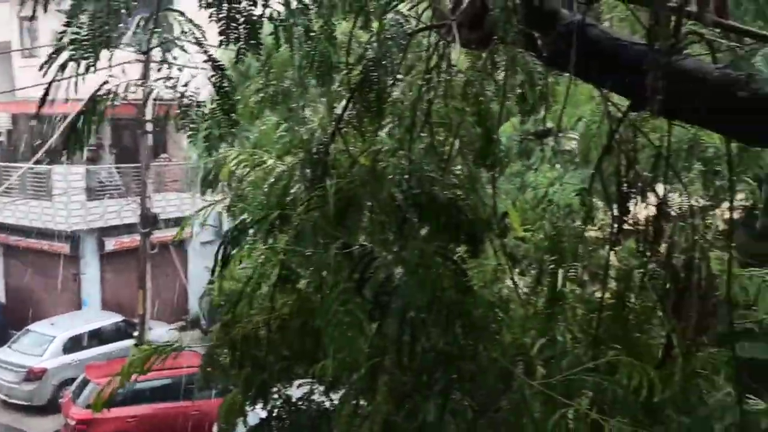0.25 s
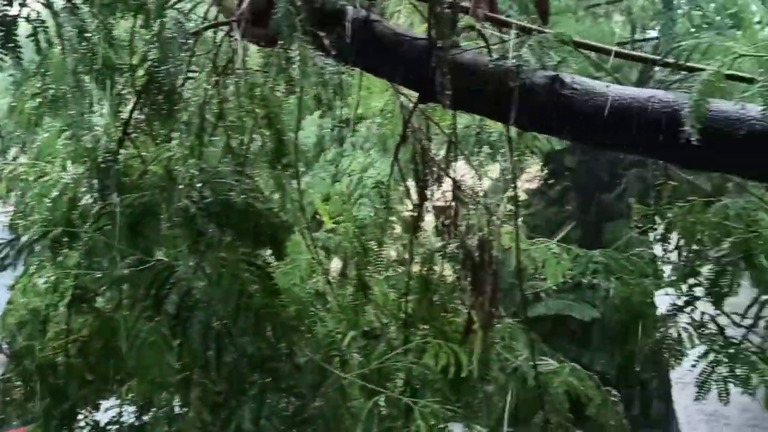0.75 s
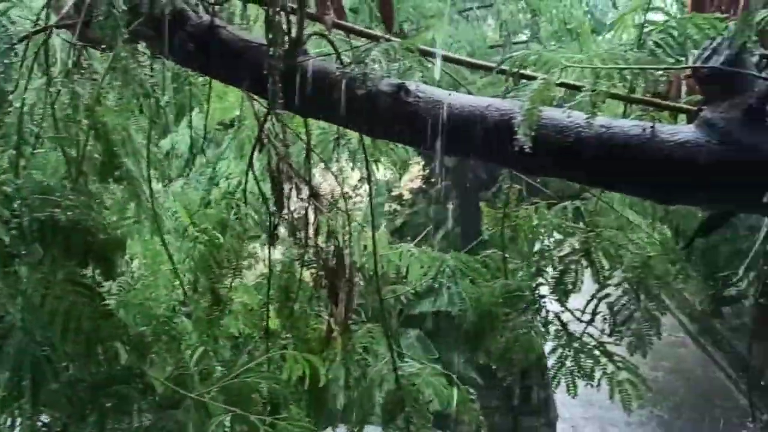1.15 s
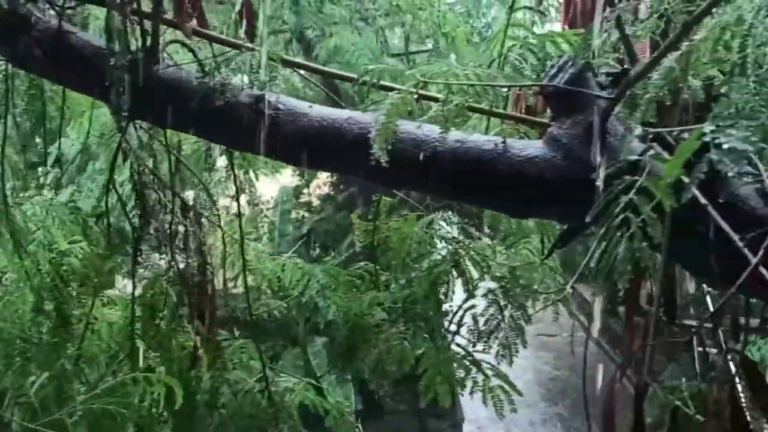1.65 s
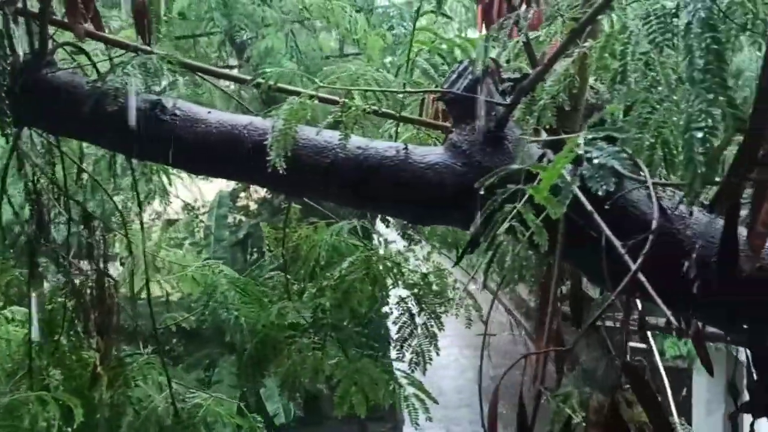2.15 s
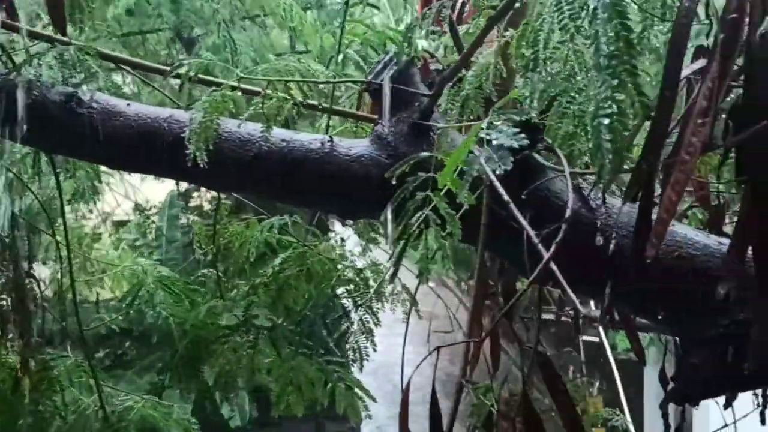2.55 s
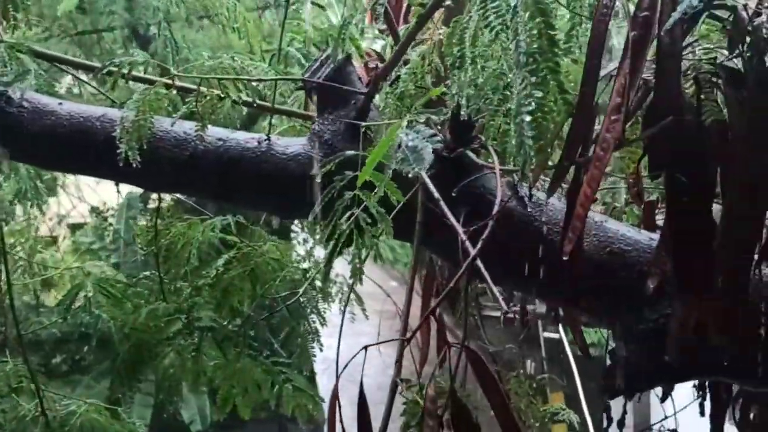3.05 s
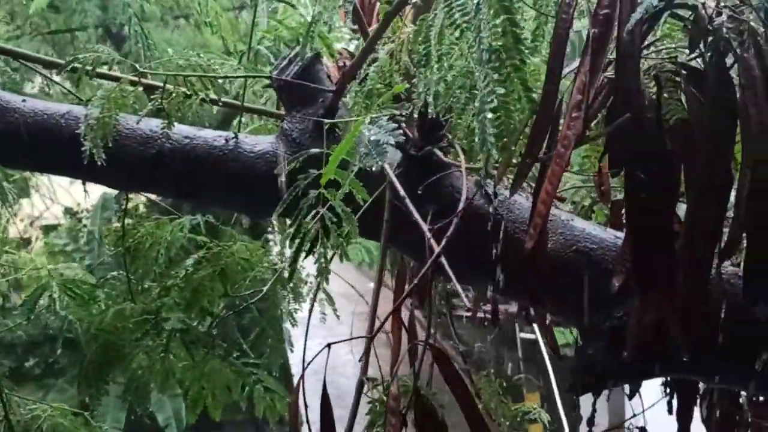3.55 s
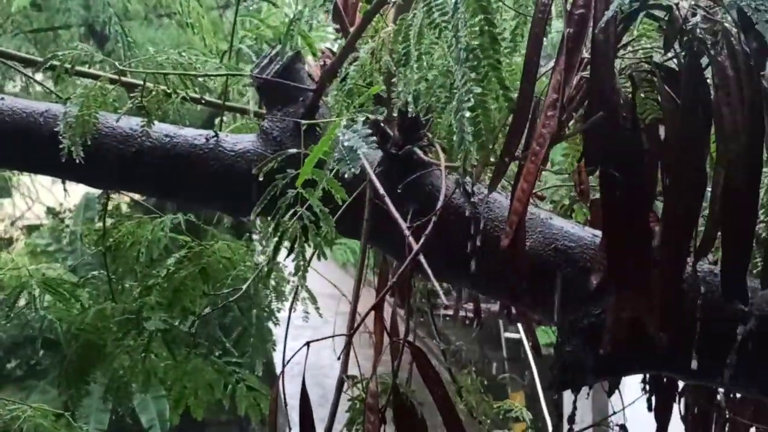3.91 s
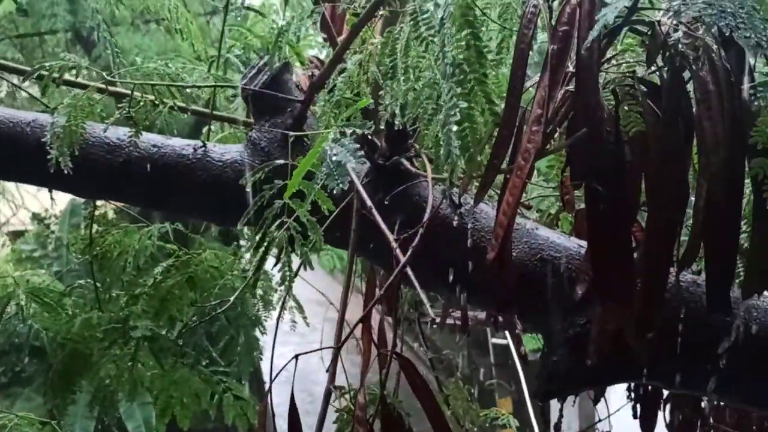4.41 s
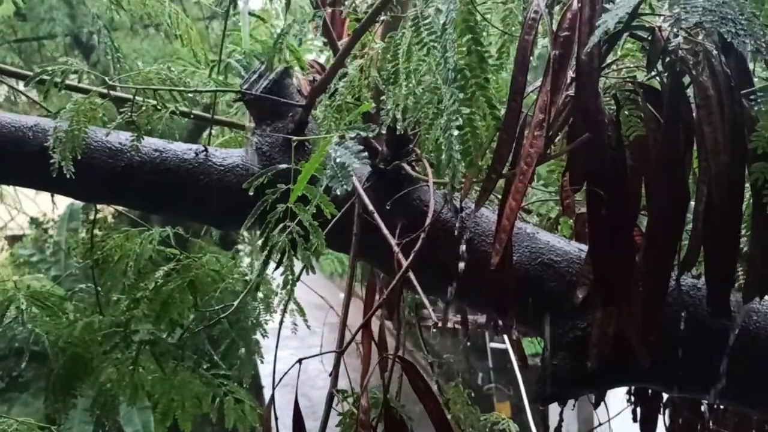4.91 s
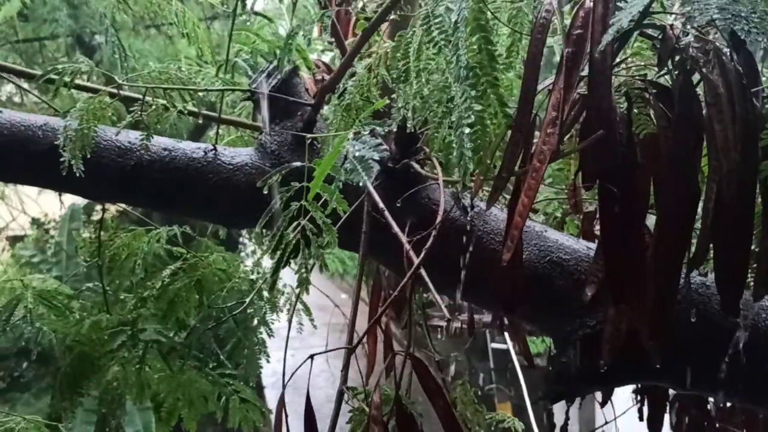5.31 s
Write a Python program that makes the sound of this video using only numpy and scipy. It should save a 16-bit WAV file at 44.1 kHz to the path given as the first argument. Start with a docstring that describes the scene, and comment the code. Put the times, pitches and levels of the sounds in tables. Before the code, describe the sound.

Heavy rain pours without a break for about five and a half seconds, heard from a sheltered spot beside tree branches. Far drops merge into a dense, wide hiss and roar, with fine patter on leaves and a soft low street rumble beneath. Rain drums dully on a sheet roof, with a few quick gushes of runoff in the first half second and occasional ones later. A faint hollow ring of drops on parked cars fades over the first two seconds. From about 1.6 seconds, fat drops burst close by in sharp, bright splats, clustering around 2.5 seconds, 3 to 3.4 seconds and 4.5 to 5 seconds. Thin ticks on wet bark and light taps on hanging seed pods mix in. Small drips plop into puddles throughout, the clearest near 4.8 seconds. The far hiss eases very slightly toward the end.

```python
"""Heavy rain on a street with trees

Heard from a sheltered spot beside the branches. Countless far drops merge into a wash over the street's
rumble; nearer ones patter on leaves and hanging seed pods, drum on a sheet roof and ring parked cars.
Close by, fat drops burst, small ones shatter on wet bark and drips plop into puddles.
Two microphone ports a hand apart hear the bass alike and the treble each on its own."""
import sys
import numpy as np
from scipy import signal
from scipy.fft import rfft, irfft, next_fast_len
from scipy.io import wavfile
from scipy.ndimage import uniform_filter1d

SR = 44100
rng = np.random.default_rng(int(sys.argv[2]) if len(sys.argv) > 2 else 0)


def wav_out(sig):
    """Save sig, one row per channel (or a flat mono array), as 16-bit PCM at SR to the path in sys.argv[1]."""
    wavfile.write(sys.argv[1], SR, np.round(np.clip(np.atleast_2d(sig).T, -1, 1) * 32767).astype(np.int16))


N = 245637
TIME = np.arange(N) / SR
FFT_SIZE = 2 * next_fast_len(N // 2 + 4096)
BIN_HZ = np.arange(FFT_SIZE // 2 + 1) * SR / FFT_SIZE
PORT_DELAY_S = 0.00049   # travel time of sound from port to port


def from_db(db):
    """Decibels to gain."""
    return 10 ** (np.asarray(db) / 20)


def rms_one(x):
    """Scale to rms 1."""
    return x / np.sqrt(np.mean(x ** 2) + 1e-20)


def gain_per_bin(points):
    """A table of (Hz, dB) as a gain at every frequency."""
    hz, db = np.transpose(points)
    return from_db(np.interp(np.log(BIN_HZ + 1), np.log(np.sort(hz)), db))


def colour(x, points):
    """Causal (minimum-phase) filter that follows a table of (Hz, dB)."""
    cepstrum = irfft(np.log(gain_per_bin(points)))
    cepstrum[1:FFT_SIZE // 2] *= 2
    cepstrum[FFT_SIZE // 2 + 1:] = 0
    return irfft(rfft(x, FFT_SIZE) * np.exp(rfft(cepstrum)))[..., :N]


def resonance(x, hz, width_hz):
    """Two-pole resonance with gain 1 at its peak."""
    r = np.exp(-np.pi * width_hz / SR)
    feedback = [1, -2 * r * np.cos(2 * np.pi * hz / SR), r * r]
    return signal.lfilter(np.array([1, 0, -1]) * (1 - r * r) / 2, feedback, x + 1e-18)


def drift(rate_hz):
    """Random wander of rms 1, changing about rate_hz times a second."""
    return rms_one(irfft(rfft(rng.standard_normal(FFT_SIZE)) / (1 + (BIN_HZ / rate_hz) ** 2))[:N])


def swells(rows, ramp_s):
    """A curve in dB that ramps, holds and returns to zero for each row."""
    return sum(db * np.clip(.5 + np.minimum(TIME - s, s + length - TIME) / ramp_s, 0, 1)
               for s, length, db in rows)


def impacts(per_s, spread_db):
    """Clicks at random moments: many small drops and, with some spread, a few big ones."""
    out, at = np.zeros(N), np.flatnonzero(rng.random(N) < per_s / SR)
    out[at] = from_db(spread_db * np.minimum(rng.exponential(1, N)[at], 4))
    return out


def spray(age, decay_s):
    """Fine droplets: a dying puff of noise, separate at each port."""
    return rng.standard_normal((2, len(age))) * np.exp(-age / decay_s)


def add_burst(out, burst, s, db, pan_db):
    """Mix in a stereo burst at s seconds, levelled by its first 5 ms; pan_db is left minus right."""
    onset_rms = burst[:, :SR // 200].std(axis=1, keepdims=True)
    gain = from_db(db + np.array([[pan_db], [-pan_db]]) / 2) / onset_rms
    start = int(s * SR)
    out[:, start:start + burst.shape[1]] += gain * burst[:, :N - start]


def all_around(left_share):
    """White noise from all sides; a share from the street on the left reaches the right port late."""
    diffuse = np.sinc(2 * BIN_HZ * PORT_DELAY_S)
    from_left = np.exp(-2j * np.pi * BIN_HZ * PORT_DELAY_S * 0.57) / (1 + (BIN_HZ / 1700) ** 4)
    alike = (1 - left_share) * diffuse + left_share * from_left
    left, own = rfft(rng.standard_normal((2, FFT_SIZE)))
    right = alike * left + np.sqrt(np.maximum(1 - abs(alike) ** 2, 0)) * own
    return irfft([left, right])[:, :N]


def wash(spectrum, left_share):
    """Far sound, merged into smooth noise; rms 1."""
    return rms_one(colour(all_around(left_share), spectrum))


def street_rumble():
    """The low rumble of the street, swelling slowly."""
    # The swell. Each row: time in seconds, level in dB.
    levels = [(0, -37), (1.7, -33), (2.5, -34), (3.3, -33), (3.7, -32), (4.6, -32.5), (5.57, -34.5)]
    # The rumble's spectrum. Each row: frequency in Hz, relative density in dB.
    spectrum = [(20, -36), (42, -38), (62, -10), (92, 4.5), (130, 5.5), (175, 4.5), (210, 1), (400, -9.5),
                (1000, -47.5)]
    level_db = np.interp(TIME, *np.transpose(levels))
    return from_db(level_db) * wash(spectrum, left_share=.02)


def sheet_roof(per_s, spread_db, stereo_width):
    """Dense rain keeps the sheet's low modes ringing; heavier drips knock on it and runoff gushes."""
    # The sheet's modes; the higher ones gain as the listener turns.
    # Each row: frequency in Hz, width in Hz, relative starting level in dB, change in dB per second.
    modes = [(282.7, 27, 5, -.5), (347, 30, 3, 0.54), (398.5, 43, -2, .5)]
    # Runoff onto the roof. Each row: start in seconds, length in seconds, dB against the steady drumming.
    gushes = [(.08, 0.051, -6), (.155, 0.067, 5.5), (.245, 0.037, 8.5), (.378, 0.028, 8.5),
              (.455, 0.044, 6), (.53, 0.059, 7), (1.29, .03, 2.5), (1.37, 0.13, 5.5), (1.82, 0.022, 5),
              (2.15, 0.041, 3), (2.51, .05, 4.5), (2.86, 0.04, 2), (3.58, 0.13, 4), (4.04, .04, 5),
              (4.66, 0.093, 3.5)]
    rainfall = all_around(left_share=0.32)
    # the sheet fills only a part of the view
    rainfall = stereo_width * rainfall + (1 - stereo_width) * rainfall.mean(axis=0)
    drive = rainfall + from_db(-8) * rms_one(impacts(per_s, spread_db))
    ringing = sum((-1) ** k * from_db(db + db_per_s * TIME) * resonance(drive, hz, width_hz)
                  for k, (hz, width_hz, db, db_per_s) in enumerate(modes))
    slow_power = uniform_filter1d(np.mean(ringing ** 2, axis=0), size=SR // 8)
    steady = rms_one(ringing / np.sqrt(slow_power + 1e-12))   # chance swells evened out
    return from_db(swells(gushes, ramp_s=0.052)) * steady


def far_roar():
    """Countless far drops merge into a roar."""
    # The roar's spectrum. Each row: frequency in Hz, relative density in dB.
    spectrum = [(100, -25.5), (230, -2), (450, 1), (620, 3), (760, 0), (900, 0.5), (1000, -2.5),
                (1500, -6.5), (2300, -11), (4000, -15), (16000, -20.5)]
    return wash(spectrum, left_share=0.15)


def parked_cars(per_s, spread_db, width_hz):
    """Drops patter on the parked cars, whose panels each give a short hollow ring."""
    # Each entry: a panel's pitch in Hz.
    panels_hz = [740, 836, 915]
    rainfall = all_around(left_share=0.4)
    return rms_one(sum(resonance(rainfall + rms_one(impacts(per_s, spread_db)), hz, width_hz)
                       for hz in panels_hz))


def far_hiss():
    """The hiss of far drops, louder at first while the open street is in view."""
    # The hiss's spectrum. Each row: frequency in Hz, relative density in dB.
    spectrum = [(500, -23.5), (1500, -1.5), (2750, -5.5), (3150, -2.5), (4700, -1.5), (8000, -7),
                (16000, -4)]
    open_street_db = 1.5 * np.exp(-TIME / 0.33)
    return from_db(open_street_db) * wash(spectrum, left_share=0.59)


def leaf_patter(per_s, spread_db, spray_s, spray_db, pan_db, count=18):
    """Drops hit leaves all around: each has its place and pitch, and gives a tick and a short spray."""
    # The patter's tone. Each row: frequency in Hz, relative gain in dB.
    tone = [(400, -20), (1500, 5.5), (3500, -3), (7000, -0.5), (16000, 5)]
    out, age = np.zeros((2, N)), TIME[:SR // 40]
    for k, hz in enumerate(np.geomspace(2800, 14500, count)):
        hits = impacts(per_s / count, spread_db)
        strike = from_db(spray_db) * spray(age, spray_s)
        place = (-1) ** k * rng.random()
        for side, sign in enumerate((1, -1)):
            tick_at = int((1 - sign * place) * PORT_DELAY_S * SR / 2)   # the nearer port hears it first
            strike[side, tick_at] += 1
            leaf = rms_one(resonance(strike[side], hz, .5 * hz))
            out[side] += from_db(sign * place * pan_db) * signal.oaconvolve(hits, leaf)[:N]
    return rms_one(colour(out, tone))


def seed_pods(per_s, centre_hz, width_hz, spray_s, count=8):
    """Drops tap on hanging pods, each with its own pitch: duller and more separate than the leaves."""
    # Shed water hits the pods. Each row: start in seconds, length in seconds, dB over the steady spatter.
    spatters = [(2.03, .09, 9), (2.48, .14, 6), (2.88, 0.074, 6), (3.15, 0.13, 7), (3.68, 0.14, 6),
                (4.74, 0.053, 12.5)]
    out, age = np.zeros((2, N)), TIME[:SR // 40]
    for hz in centre_hz * 2 ** np.linspace(-.3, .3, count):
        tap = rms_one(resonance(spray(age, spray_s), hz, width_hz))
        hits = impacts(per_s / count, spread_db=0)
        out += signal.oaconvolve(hits[None], tap, axes=1)[:, :N]
    return from_db(swells(spatters, ramp_s=0.032)) * rms_one(out)


def puddle_plops(small_db, cycles, rise, splash_db, splash_s, count=260):
    """Each drip splashes and traps a bubble that rings and rises in pitch; small ones fall at random."""
    # The clearest drips. Each row: start in seconds, bubble level in dB, starting pitch in Hz.
    plops = [(1.504, -30, 2120), (3.156, -27, 2630), (4.79, -21, 2990)]
    small = [(u * TIME[-1], small_db - 9 * v - 5 * w, 650 * 5 ** w) for u, v, w in rng.random((count, 3))]
    out, age = np.zeros((2, N)), TIME[:SR // 16]
    for s, db, hz in plops + small:
        turns = hz * age
        envelope = np.exp(-turns / cycles) * (1 - np.exp(-turns))
        bubble = envelope * np.sin(2 * np.pi * turns * (1 + rise * turns / cycles))
        splash = resonance(spray(age, splash_s), hz, width_hz=940)
        plop = from_db(db) * (bubble + from_db(splash_db) * splash / np.abs(splash).max())
        for side, lag_s in enumerate(rng.random(2) * PORT_DELAY_S):
            start = min(int((s + lag_s) * SR), N)
            out[side, start:start + len(age)] += plop[side, :N - start]
    return out


def fat_drops(width_hz, grain_db, splat_hz, spray_hz, count=14):
    """A fat drop strikes, rebounds and bursts into droplets: a bright ring, a dull splat, a fine spray."""
    # The loudest drops close by. Each row: start in seconds, level in dB, ring in Hz, left minus right
    # in dB, then the relative levels in dB of the droplet tail, the fine spray and the dull splat.
    splashes = [(.069, -26, 4570, -6, -10, -12, -14), (1.6308, -18, 6600, 1.5, -11, -5, -24),
                (1.8417, -20, 5900, 1, -7, -7, -17), (2.3387, -24, 5900, -5, -4, -7, -17),
                (2.3685, -25, 6300, -7, -12, -14, -15), (2.4955, -21, 7500, -8, -5, 4, -15),
                (2.533, -21.5, 5800, -2, -8, -12, -4), (2.5366, -21, 5800, 5, -2, -4, 2),
                (2.546, -27, 2500, -3, -4, -8, -11), (2.74, -23, 7000, 1, -10, -1, -19),
                (2.875, -25, 7200, 2, -12, -12, -20), (2.922, -25, 6600, -7, -9, -15, -11),
                (3.05, -19.3, 6300, -5, -5, -8, 1), (3.296, -16.5, 7000, -1, -14, 1, 0),
                (3.317, -23, 6700, -5, -9, -14, -20), (3.3908, -20.5, 3400, -1, -6, -8, -1),
                (3.713, -19, 7700, 2, -4, -10, -26), (3.879, -23.5, 7600, 11, -1, -17, -23),
                (4.0153, -21.3, 4200, -4, -12, -2, -8), (4.5518, -21, 6800, -1, -4, -8, -22),
                (4.729, -19.8, 6200, -6, -4, -14, -24), (4.799, -26, 6900, -6, -4, -12, -17),
                (4.9735, -23.5, 6600, 0, -8, -3, -20)]
    # smaller ones fall at random
    small = [(u * TIME[-1], -23.5 - 4 * v, 7360 * 2 ** (.5 * (w - .5)), 6 * (2 * p - 1), -7, -10, -27)
             for u, v, w, p in rng.random((count, 4))]
    strike_s, rebound_s, tail_s = 0.00064, .0022, 0.0076
    out, age = np.zeros((2, N)), TIME[:SR // 25]
    for s, db, hz, pan_db, tail_db, spray_db, splat_db in splashes + small:
        since_rebound = age - rebound_s * (.5 + rng.random())
        rebound = from_db(-6) * (since_rebound > 0) * np.exp(-abs(since_rebound) / strike_s)
        envelope = np.exp(-age / strike_s) + rebound + from_db(tail_db) * np.exp(-age / tail_s)
        droplets = rng.standard_normal((2, len(age))) * envelope
        droplets *= from_db(grain_db * rng.standard_normal(len(age)))
        ring = resonance(droplets, hz, width_hz)
        splat = from_db(splat_db) * resonance(droplets, splat_hz, splat_hz)
        fine_spray = from_db(spray_db) * resonance(droplets, spray_hz, .5 * spray_hz)
        add_burst(out, ring + splat + fine_spray, s, db, pan_db)
    return out


def bark_ticks(hz, width_hz, decay_s):
    """Small drops shatter on the wet bark into fine spray: thin, very bright ticks."""
    # Drops on the nearest branch. Each row: start in seconds, level in dB, left minus right in dB.
    ticks = [(.994, -25, -13), (1.683, -24, -3), (1.9695, -24, -5), (2.082, -23, -7), (2.466, -24, -6),
             (2.5175, -24, -5), (2.8475, -27, -8), (4.2516, -24, -3), (4.454, -22, 4), (4.503, -21, -8),
             (4.547, -22, -4), (4.707, -19.5, -4), (4.871, -24, -12), (5.17, -18, 0)]
    out, age = np.zeros((2, N)), TIME[:SR // 25]
    for s, db, pan_db in ticks:
        add_burst(out, resonance(spray(age, decay_s), hz, width_hz), s, db, pan_db)
    return out


def scene():
    """Street, roof, cars, easing far rain and near drops, as they reach the shelter."""
    # The branches shed water. Each row: start in seconds, length in seconds, dB over the steady rain.
    showers = [(2.4, 0.3, 1), (2.9, 0.7, 0.65), (4.5, 0.53, 0.5)]
    # The rain is brighter on the right. Each row: frequency in Hz, left minus right in dB.
    balance = [(300, 0.5), (800, 0), (1500, -2.5), (3600, -3.5), (5200, -2), (6600, -1), (7400, 1.5),
               (8100, 1.5), (12000, -2), (15000, -3.5)]
    shower_db = swells(showers, ramp_s=0.048)
    flurry = drift(rate_hz=24)   # water leaves the branches in quick clumps
    street = street_rumble()
    roof = from_db(-30) * sheet_roof(per_s=70, spread_db=0.5, stereo_width=0.79)
    roar = from_db(-25.5 - 0.04 * TIME) * far_roar()
    # the cars fade as the listener turns away
    cars = from_db(-32.5 - 6 * TIME) * parked_cars(per_s=60, spread_db=1, width_hz=71)
    hiss = from_db(-22.5 - 0.51 * TIME + shower_db + 0.29 * flurry) * far_hiss()
    leaves = leaf_patter(per_s=1200, spread_db=3, spray_s=0.0061, spray_db=-12.5, pan_db=-1)
    leaves *= from_db(-27.5 + shower_db + 1.34 * flurry)
    near = fat_drops(width_hz=2200, grain_db=3, splat_hz=3000, spray_hz=13400)
    near += bark_ticks(hz=13400, width_hz=4700, decay_s=0.0056)
    near += puddle_plops(small_db=-32.5, cycles=18, rise=0.02, splash_db=6.5, splash_s=0.014)
    pods = from_db(-41) * seed_pods(per_s=260, centre_hz=3810, width_hz=930, spray_s=0.0027)
    lean = np.sqrt(gain_per_bin(balance))
    rain = irfft(rfft(roar + hiss + leaves + pods, FFT_SIZE) * [lean, 1 / lean])[:, :N]
    return street + roof + cars + rain + near


def record(dry):
    """The treble is uneven, with a shallow dip and a deep gap, and the top is cut steeply."""
    # The treble's shape. Each row: frequency in Hz, gain in dB.
    treble = [(4720, 0.5), (4790, -7), (6060, -4.5), (6140, 2), (6820, 3.5), (6920, 0.5), (7620, 4.5),
              (7690, -0.5), (8480, -1), (8780, -35.5), (11430, -105), (11620, -9), (12850, -10.5),
              (12980, -7.5), (15500, -10)]
    cutoff_hz = 15480
    low_pass = signal.ellip(12, .1, 80, cutoff_hz, fs=SR, output="sos")
    return signal.sosfilt(low_pass, colour(dry, treble))


dry = scene()
out = record(dry)
wav_out(out)
```